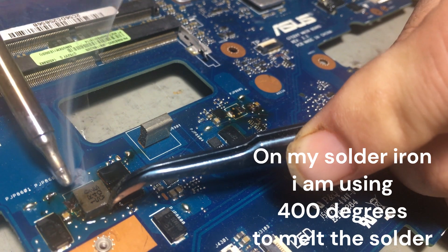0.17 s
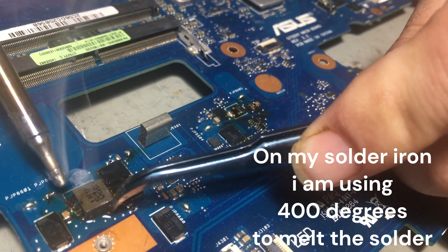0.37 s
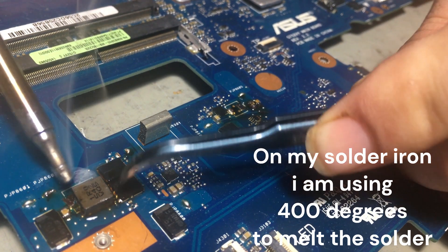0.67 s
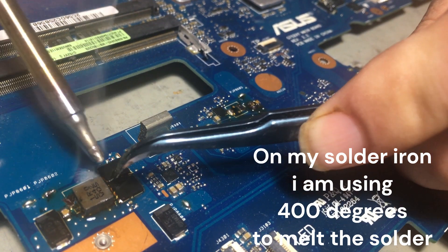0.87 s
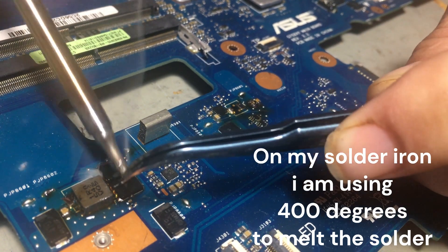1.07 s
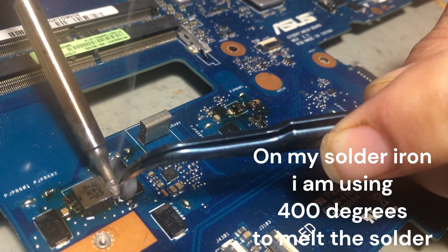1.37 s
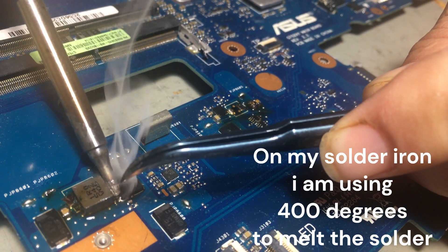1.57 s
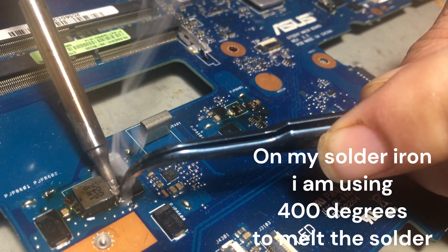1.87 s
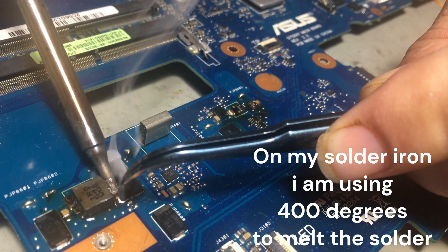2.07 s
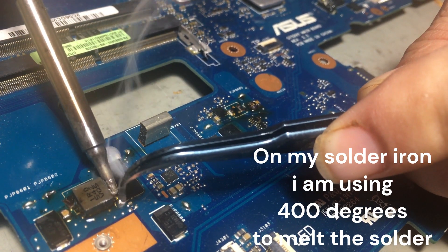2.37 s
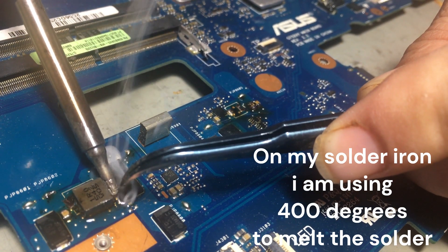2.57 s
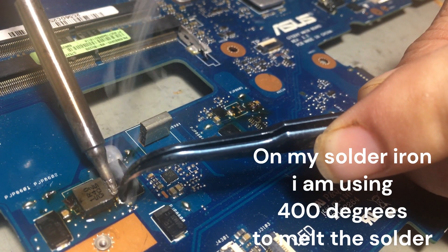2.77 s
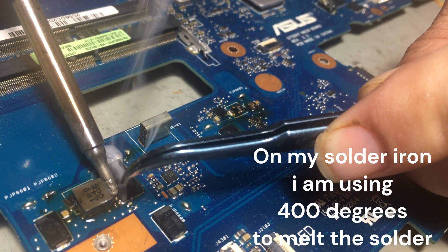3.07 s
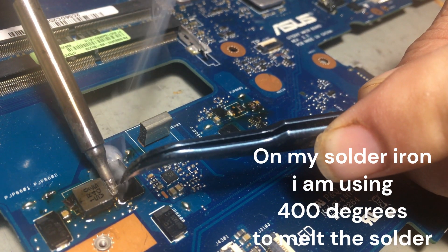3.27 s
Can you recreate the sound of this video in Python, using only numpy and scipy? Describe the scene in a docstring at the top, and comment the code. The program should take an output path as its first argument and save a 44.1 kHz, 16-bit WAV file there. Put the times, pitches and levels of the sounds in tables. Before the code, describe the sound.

Soldering iron sizzle on a circuit board: after a tweezer click and light tick, a sharp fizz flares, then settles into a crackling, spitting simmer. Low fan rumble and faint hiss continue; close, dry mono microphone.

```python
"""A hot soldering iron meets flux on a circuit board: a sudden fizz of random bubble bursts and hissing
vapour, with crackle on top, flares and settles to a simmer. Larger bubbles spit as snaps of banded noise.
Tweezers and the iron's tip tick on the board as damped modes with a crack of noise, and the tip scrapes.
Behind them two fan tones beat, with mains hum, filtered noise for rushing air and room hiss,
a thin whine and a faint electric buzz that pulses with the fan."""
import sys
import numpy as np
from scipy import signal
from scipy.fft import rfft, irfft, next_fast_len
from scipy.io import wavfile
from scipy.ndimage import map_coordinates

SR = 44100
rng = np.random.default_rng(int(sys.argv[2]) if len(sys.argv) > 2 else 0)


def waveform_to_disk(signal):
    """Save audio, clipped to [-1, 1], as 16-bit WAV at the path in sys.argv[1]."""
    frames = np.transpose(np.atleast_2d(signal))
    scaled = np.clip(frames, -1, 1) * 32767
    samples = np.round(scaled).astype(np.int16)
    wavfile.write(sys.argv[1], SR, samples)


N = 150381
TOP_HZ = 15800  # upper band limit of the spits and the microphone
CONTACT_S = 0.0002  # time constant of a tick's rise


def amp(db):
    """Decibels to gain."""
    return 10 ** (np.asarray(db) / 20)


def unit(x):
    """Scale to rms 1."""
    return x / np.sqrt(np.mean(x ** 2) + 1e-20)


def filtered(x, response):
    """Shape the spectrum of x with a gain that is a function of frequency."""
    size = next_fast_len(len(x) + 8192)
    spectrum = rfft(x, size) * response(np.fft.rfftfreq(size, 1 / SR))
    return irfft(spectrum, size)[:len(x)]


def coloured(x, points):
    """Draw an EQ curve through (frequency [Hz], level [dB]) points on a log axis; rms 1."""
    f, db = np.transpose(points)
    return unit(filtered(x, lambda hz: amp(np.interp(np.log(hz + 1), np.log(f + 1), db))))


def resonant(hz, width_hz):
    """Noise through one resonance, at rms 1."""
    peak = lambda f: 1 / (1 + ((f - hz) / width_hz) ** 2 * 2) ** 1.3
    return unit(filtered(rng.standard_normal(N), peak))


def wobble(rate):
    """A smooth random curve with rate knots a second."""
    return map_coordinates(rng.standard_normal(256), [np.arange(N) * rate / SR], mode="wrap")


def bursts(per_s, spread_db):
    """Random impulses of uneven size and sign; rate changes leave the power even, at rms 1."""
    chance = np.clip(per_s / SR, 1e-4, 1)
    level_db = spread_db * np.clip(rng.standard_normal(N), -2, 2)
    sizes = amp(level_db) * np.sign(rng.standard_normal(N))
    return unit((rng.random(N) < chance) * sizes / np.sqrt(chance))


def add(track, s, sound):
    """Mix a sound into the track at time s."""
    part = track[round(s * SR):][:len(sound)]
    part += sound[:len(part)]


FAN_HZ, SECOND_FAN_HZ, SECOND_FAN_DB, MAINS_HZ = 63.65, 58.3, -55.5, 60
HUM_DRIFT_TURNS, HUM_WAVER_DB = 0.017, -0.6  # random phase drift, random level waver
# main fan and its overtones: (multiple of FAN_HZ, level [dB])
FAN_OVERTONES = [(1, -50.5), (2, -49), (3, -58.5), (4, -59.5), (7, -64.5)]
# mains hum: (multiple of MAINS_HZ, level [dB])
MAINS_OVERTONES = [(2, -56), (4, -67.5)]


def fan_and_mains_tones():
    """Two close fan tones beat beside overtones and mains hum, each a slightly unsteady sine."""
    t = np.arange(N) / SR
    lines = [(k * FAN_HZ, db) for k, db in FAN_OVERTONES]
    lines += [(k * MAINS_HZ, db) for k, db in MAINS_OVERTONES]
    lines.append((SECOND_FAN_HZ, SECOND_FAN_DB))
    tones = np.zeros(N)
    for hz, db in lines:
        level = amp(db + HUM_WAVER_DB * wobble(5))
        turns = hz * t + HUM_DRIFT_TURNS * wobble(3.04)
        tones += level * np.sin(2 * np.pi * turns)
    return np.sqrt(2) * tones  # levels are rms


AIR_DB = -45.5
# spectrum of the moving air: (frequency [Hz], relative level [dB per Hz])
AIR_SPECTRUM = [(20, -46), (35, -23), (50, -12), (70, -10.5), (92, -17), (120, -3), (160, -6.5), (200, -4),
                (260, -4), (340, -5), (385, -9.5), (435, -8.5), (480, -15), (570, -12), (690, -13.5),
                (770, -22.5), (950, -20), (1250, -25), (1500, -33.5), (1950, -42), (3300, -98)]
# resonances of the fan housing: (frequency [Hz], width [Hz], level [dB])
HOUSING_RESONANCES = [(100, 5.7, -64.5), (139.4, 2.5, -63), (223, 12.5, -57.5), (256, 19.4, -54.5),
                      (287.4, 7.3, -56.5), (334.5, 10.6, -57.5), (613.5, 10, -74.5), (679.7, 22, -62.5),
                      (849.6, 6.8, -70.5), (897, 4.4, -74.5), (956, 27, -69.5), (1181, 60, -69.5),
                      (2220, 90, -77)]


def fan_air():
    """Rushing air is broad noise; the fan housing adds narrow bands of resonant noise."""
    air = amp(AIR_DB) * coloured(rng.standard_normal(N), AIR_SPECTRUM)
    housing = sum(amp(db) * resonant(hz, width) for hz, width, db in HOUSING_RESONANCES)
    return air + housing


HISS_DB = -61
# spectrum of the room hiss: (frequency [Hz], relative level [dB per Hz])
HISS_SPECTRUM = [(710, -40.5), (1200, -2), (1500, -6.5), (1640, -4), (2600, -12), (3050, -15), (3820, -17),
                 (4780, -21.5), (5990, -20), (8090, -28), (9500, -25.5), (10500, -30.5), (15600, -37)]


def room_hiss():
    """Steady noise in the colour of the room."""
    return amp(HISS_DB) * coloured(rng.standard_normal(N), HISS_SPECTRUM)


WHINE_HZ, WHINE_WIDTH_HZ, WHINE_DB = 9320, 110, -85.5
BUZZ_HZ, BUZZ_WANDER_HZ, BUZZ_DB = 9930, 30, -87.5
BUZZ_SHARPNESS = 4  # exponent that narrows each pulse


def electric_buzz():
    """A thin steady whine, and a high tone of wandering pitch that pulses once per fan cycle."""
    t = np.arange(N) / SR
    pulses = np.abs(np.cos(np.pi * FAN_HZ * t)) ** BUZZ_SHARPNESS
    pitch_hz = BUZZ_HZ + BUZZ_WANDER_HZ * wobble(70)
    carrier = np.sin(2 * np.pi * np.cumsum(pitch_hz) / SR)
    whine = amp(WHINE_DB) * resonant(WHINE_HZ, WHINE_WIDTH_HZ)
    return amp(BUZZ_DB) * unit(pulses * carrier) + whine


KNOCK_TRIM_DB, CRACK_DB, CRACK_T60_S = -3, -2.5, 0.014
# modes of the board: (frequency [Hz], relative level [dB], decay t60 [s])
BOARD_MODES = [(1160, -9, .05), (1660, -8, .03), (2280, -7, .025), (2510, -10, 0.022), (3010, -5.5, 0.016),
               (3620, -6, 0.013)]
# spectrum of the contact crack: (frequency [Hz], relative level [dB per Hz])
CRACK_SPECTRUM = [(400, -15), (1500, 7), (3500, 0), (4500, -7), (10000, -14), (15000, -24)]


def knock(db, bright_db):
    """A tool tip touches the board: a short crack and a few damped modes, tilted in dB per octave."""
    t = np.arange(SR // 10) / SR
    tilt = lambda hz: amp(bright_db * np.log2(np.maximum(hz, 1000) / 2500))
    ring = np.zeros(len(t))
    for hz, level, t60 in BOARD_MODES:
        decay = amp(level + rng.normal(0, 1.7) - 60 * t / t60)  # each knock excites the modes unevenly
        ring += tilt(hz) * decay * np.sin(2 * np.pi * (hz * t + rng.random()))
    crack = filtered(coloured(rng.standard_normal(len(t)), CRACK_SPECTRUM), tilt)
    crack *= amp(CRACK_DB - 60 * t / CRACK_T60_S)
    return amp(KNOCK_TRIM_DB + db) * (ring + crack) * (1 - np.exp(-t / CONTACT_S))


# time [s], level before the knock trim [dB], brightness [dB per octave]
CLICK_S, CLICK_DB, CLICK_BRIGHT_DB = .3461, -39, -2
# steel of the tweezers: (frequency [Hz], level [dB], decay t60 [s])
STEEL_MODES = [(2310, -44, 0.031), (3180, -50, .016), (5310, -45, .015), (5730, -52, .011),
               (9600, -55, .008), (11200, -59, .01)]


def tweezers():
    """One click knocks the board and rings the damped modes of the steel."""
    out, t = np.zeros(N), np.arange(SR // 10) / SR
    ring = sum(amp(db - 60 * t / t60) * np.sin(2 * np.pi * hz * t) for hz, db, t60 in STEEL_MODES)
    steel = ring * (1 - np.exp(-t / CONTACT_S))
    add(out, CLICK_S, steel + knock(CLICK_DB, CLICK_BRIGHT_DB))
    return out


ROOM_DB, ROOM_T60_S = -16, 0.1


def room(x):
    """The bench and walls answer with a short, decaying noise tail."""
    t = np.arange(SR // 3) / SR
    tail = rng.standard_normal(len(t)) * amp(-60 * t / ROOM_T60_S) * (t > .002)
    return signal.fftconvolve(x, tail / np.linalg.norm(tail))[:N]


SPIT_TRIM_DB, SPIT_T60_S, SPIT_WIDTH_OCT = 1.5, .002, .4
SPRAY_DB, SPRAY_T60_S = -11.5, 0.026  # relative to the snap
# larger bubbles that spit: (time [s], peak level before the trim [dB], centre pitch [Hz])
FLUX_SPITS = [(.6055, -64, 14800), (1.325, -47, 13500), (1.579, -45, 12000), (1.594, -49, 11000),
              (1.698, -49, 12000), (1.8045, -47, 12000), (1.8499, -50, 12500), (1.879, -50, 13500),
              (1.960, -48, 7000), (2.0393, -52, 12000), (2.1224, -50, 14000), (2.1526, -47, 14200),
              (2.162, -50, 12000), (2.1933, -49, 11500), (2.2289, -50, 14500), (2.2601, -49, 11500),
              (2.3367, -46.5, 13000), (2.3813, -50, 14000), (2.4254, -53, 13500), (2.4683, -51, 13500),
              (2.7021, -51, 13000), (2.7861, -44, 12100), (2.8349, -55, 13000), (2.9828, -49, 13000),
              (3.1112, -53, 13000), (3.2321, -53, 12000), (3.2487, -49, 9500), (3.3764, -56, 13500)]


def spits():
    """Each larger bubble of flux snaps at its own pitch and leaves a brief spray."""
    out, t = np.zeros(N), np.arange(SR // 20) / SR
    shape = amp(-60 * t / SPIT_T60_S) + amp(SPRAY_DB - 60 * t / SPRAY_T60_S)
    for s, db, hz in FLUX_SPITS:
        band = lambda f: (f < TOP_HZ) / (1 + (np.log2((f + 1) / hz) / SPIT_WIDTH_OCT) ** 2)
        snap = filtered(rng.standard_normal(len(t)), band) * shape
        add(out, s, amp(SPIT_TRIM_DB + db) * snap / np.abs(snap).max())
    return out


# ticks of the hot tip: (time [s], level before the knock trim [dB], brightness [dB per octave])
TIP_TICKS = [(.744, -46, -6), (1.326, -43, -9.5), (1.374, -39.5, 2), (1.464, -49, -1), (1.499, -46.5, -5),
             (2.2598, -47, 0)]


def tip_ticks():
    """The iron's tip knocks on the board."""
    out = np.zeros(N)
    for s, db, bright_db in TIP_TICKS:
        add(out, s, knock(db, bright_db))
    return out


SCRAPE_S, SCRAPE_WIDTH_S, SCRAPE_DB, SCRAPE_SLIPS_PER_S = 1.326, 0.015, -53, 1400
# spectrum of the scrape: (frequency [Hz], relative level [dB per Hz])
SCRAPE_SPECTRUM = [(400, -12), (1000, -3), (2200, 4), (3500, -6), (5000, -14), (12000, -28)]


def tip_scrape():
    """The tip scrapes briefly as it settles: a dense run of small slips under one swell."""
    stroke = np.exp(-((np.arange(N) / SR - SCRAPE_S) / SCRAPE_WIDTH_S) ** 2)
    slips = coloured(bursts(SCRAPE_SLIPS_PER_S, spread_db=4.5), SCRAPE_SPECTRUM)
    return amp(SCRAPE_DB) * stroke * slips


# the flux flashes on contact, holds, then simmers down; boosts are above the simmer
TOUCH_S, ATTACK_S, HOLD_S = 1.303, 0.028, .075
FLASH_DB, FLASH_FADE_S, SETTLE_DB, SETTLE_S = 2, .03, 8, .5
# rates and levels once settled to a simmer; steam is relative to the bubble bursts
BUBBLES_PER_S, BUBBLE_SPREAD_DB, STEAM_DB, SIMMER_DB = 1600, 4.5, -2, -67.5
CRACKLES_PER_S, CRACKLE_DB, CRACKLE_SPREAD_DB, CRACKLE_T60_S = 170, -73.5, 3.5, 0.003
# spectrum of the tiny bubbles and vapour: (frequency [Hz], relative level [dB per Hz])
FIZZ_SPECTRUM = [(900, -7), (2000, -7), (3500, -1.5), (4500, -0.5), (6000, 1), (8000, 0.5), (9400, 3),
                 (10000, -2.5), (10400, -12), (11000, 2.5), (11600, 3), (12150, -5), (12700, 0),
                 (13700, -3), (14250, -2), (15000, -11), (15700, -7.5)]
# spectrum of the middling bubbles: (frequency [Hz], relative level [dB per Hz])
CRACKLE_SPECTRUM = [(2000, -42), (6000, -9), (10000, -10), (12000, -4), (15700, -4.5)]


def sizzle():
    """Tiny bubbles burst and crackle over hissing vapour; they thin out as the flux boils away."""
    age = np.arange(N) / SR - TOUCH_S
    spent = np.maximum(age - ATTACK_S - HOLD_S, 0)
    boil_db = FLASH_DB * np.exp(-spent / FLASH_FADE_S) + SETTLE_DB * np.exp(-spent / SETTLE_S)
    boil = amp(boil_db) ** 2  # a fiercer boil bursts more often as well as louder

    bubbles = bursts(BUBBLES_PER_S * boil, BUBBLE_SPREAD_DB)
    steam = amp(STEAM_DB) * rng.standard_normal(N)
    fizz = coloured(bubbles + steam, FIZZ_SPECTRUM)

    # each middling burst gates noise with a short decay; overlapping bursts add in power
    decay = amp(-60 * np.arange(SR // 100) / SR / CRACKLE_T60_S)
    hits = bursts(CRACKLES_PER_S * boil, CRACKLE_SPREAD_DB)
    snaps = np.sqrt(np.abs(signal.fftconvolve(hits ** 2, decay ** 2)[:N]))
    crackle = coloured(snaps * rng.standard_normal(N), CRACKLE_SPECTRUM)

    onset = np.clip(age / ATTACK_S, 0, 1)
    level = onset * amp(boil_db + 0.91 * wobble(60))  # with a quick random flutter
    return (amp(SIMMER_DB) * fizz + amp(CRACKLE_DB) * crackle) * level


def scene():
    """Fans, hiss and buzz lie behind; clicks, spits and scrape get a room tail, the sizzle stays dry."""
    background = fan_and_mains_tones() + fan_air() + room_hiss() + electric_buzz()
    clicks = tweezers() + spits() + tip_ticks() + tip_scrape()
    return (background + clicks + amp(ROOM_DB) * room(clicks) + sizzle())[None]


def record(dry):
    """The microphone keeps nothing above its band limit."""
    return np.array([filtered(channel, lambda hz: hz < TOP_HZ) for channel in dry])


dry = scene()
out = record(dry)
waveform_to_disk(out)
```